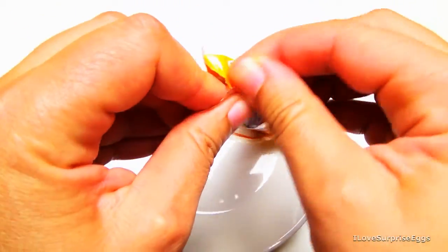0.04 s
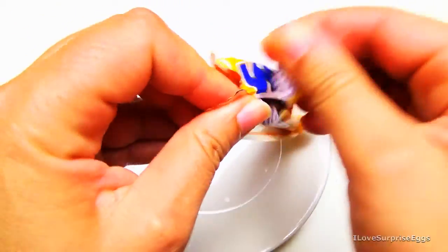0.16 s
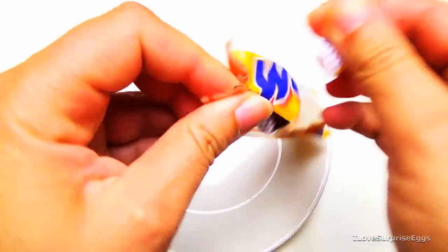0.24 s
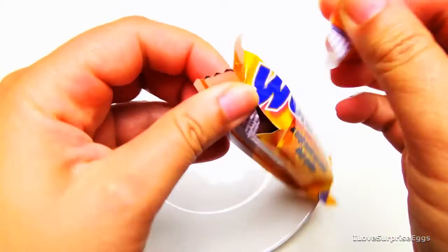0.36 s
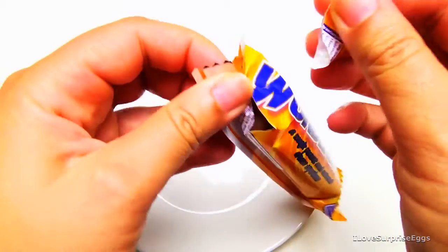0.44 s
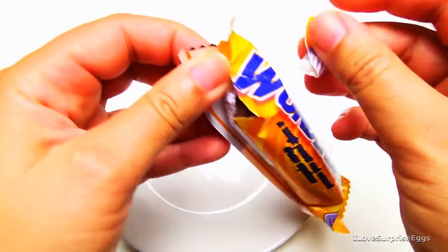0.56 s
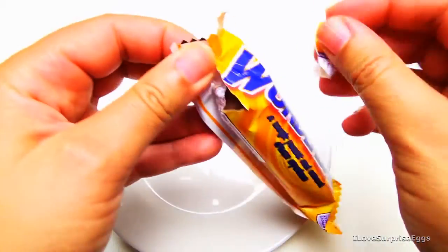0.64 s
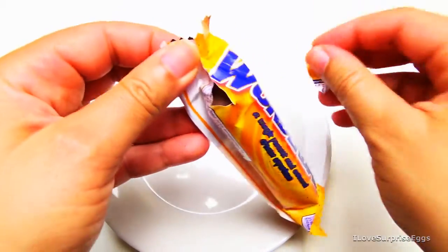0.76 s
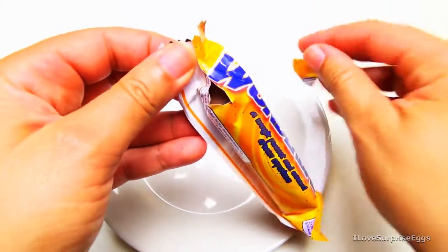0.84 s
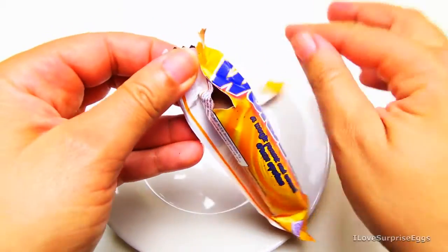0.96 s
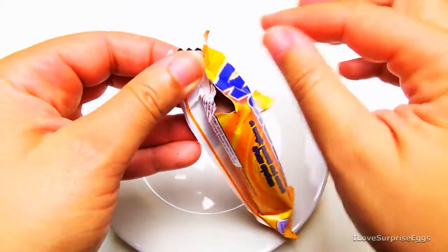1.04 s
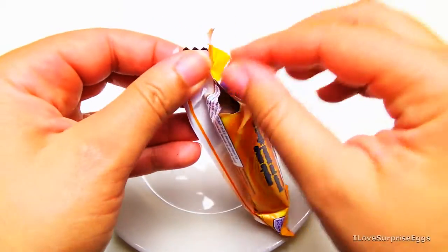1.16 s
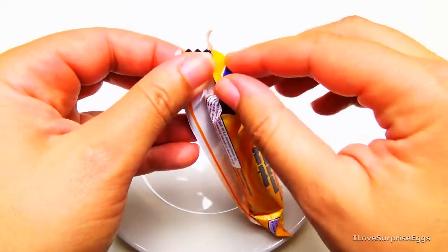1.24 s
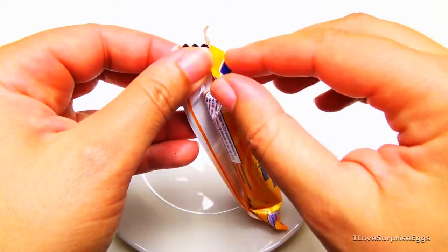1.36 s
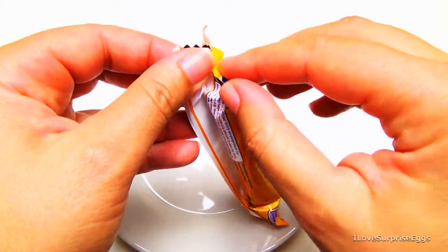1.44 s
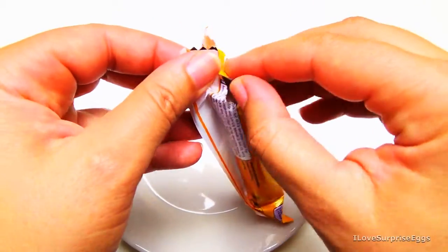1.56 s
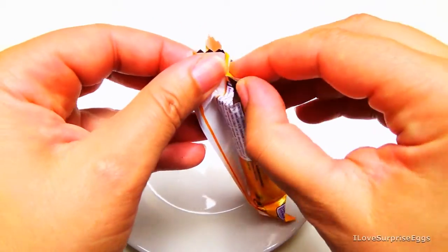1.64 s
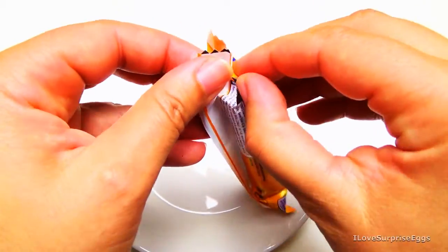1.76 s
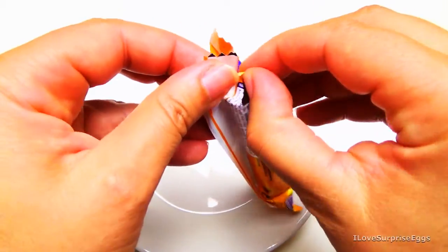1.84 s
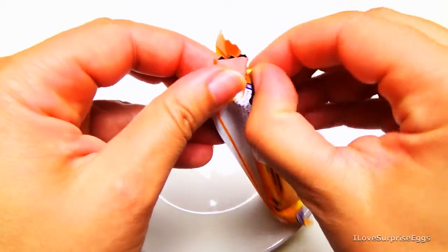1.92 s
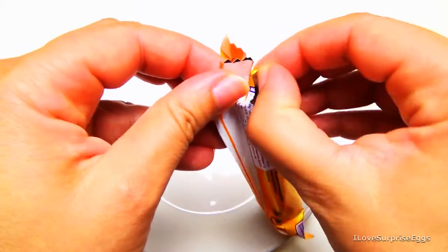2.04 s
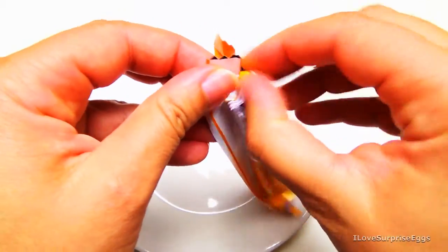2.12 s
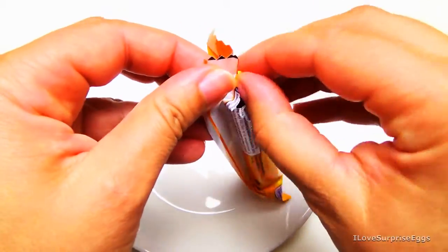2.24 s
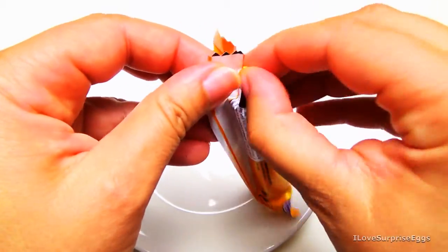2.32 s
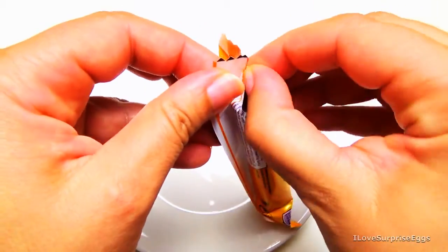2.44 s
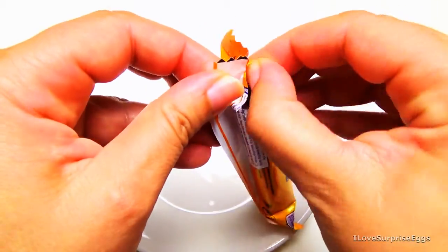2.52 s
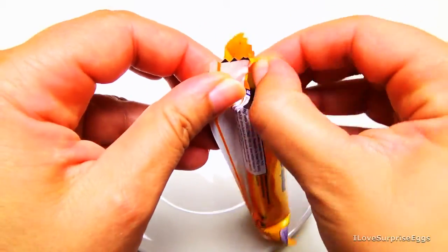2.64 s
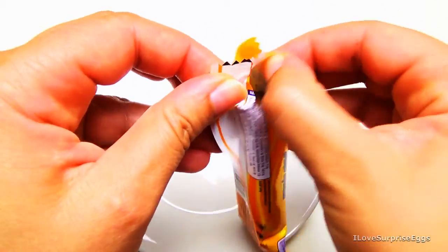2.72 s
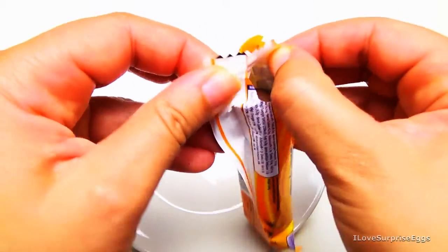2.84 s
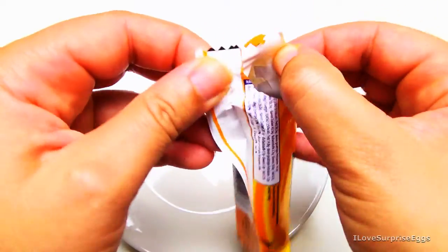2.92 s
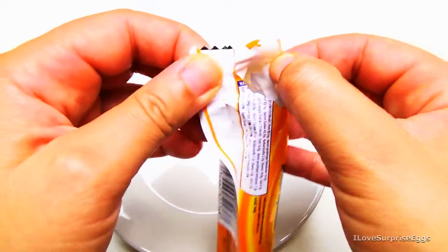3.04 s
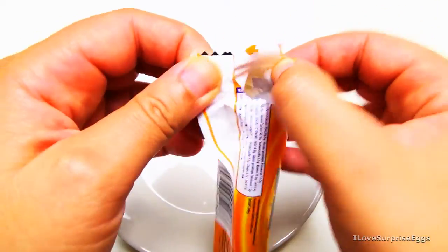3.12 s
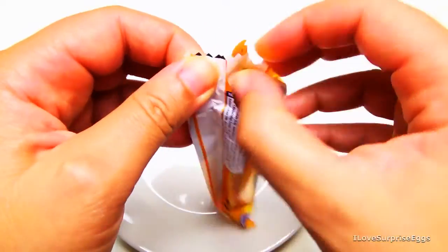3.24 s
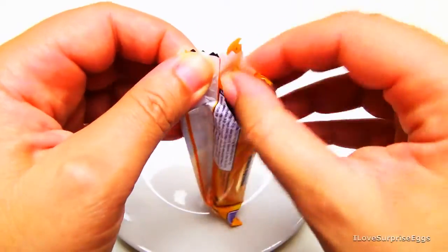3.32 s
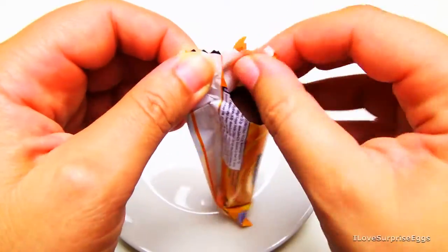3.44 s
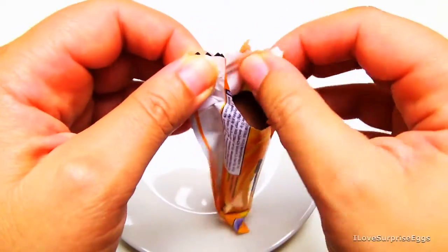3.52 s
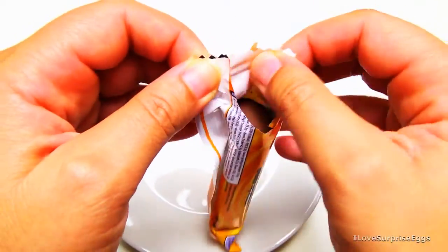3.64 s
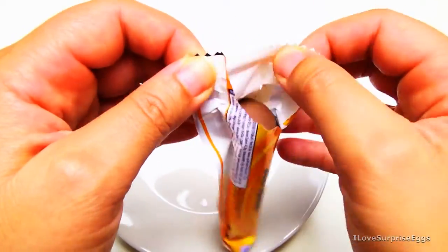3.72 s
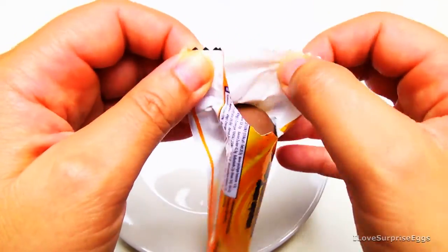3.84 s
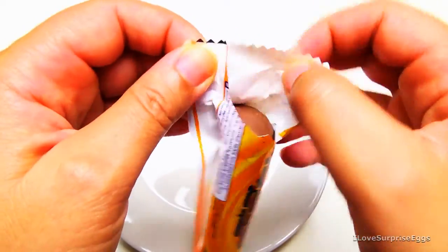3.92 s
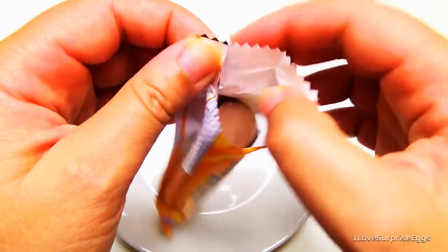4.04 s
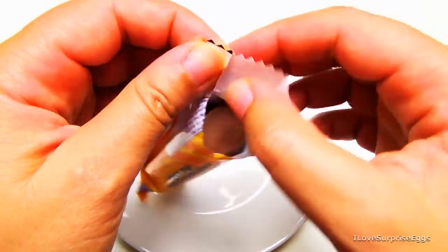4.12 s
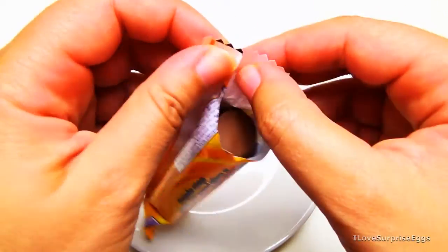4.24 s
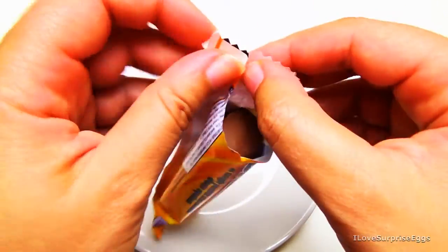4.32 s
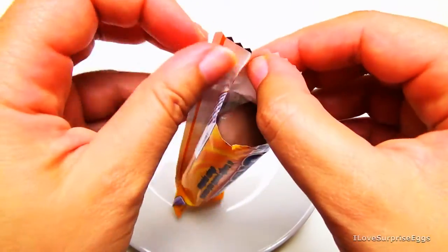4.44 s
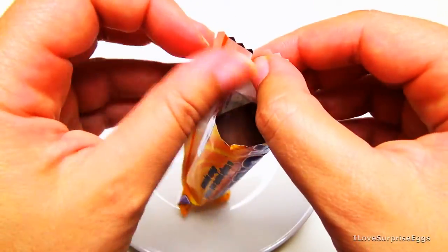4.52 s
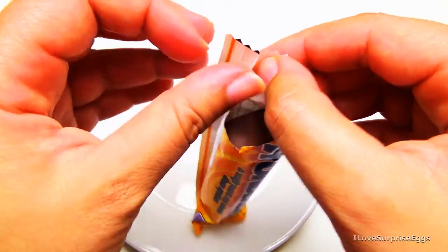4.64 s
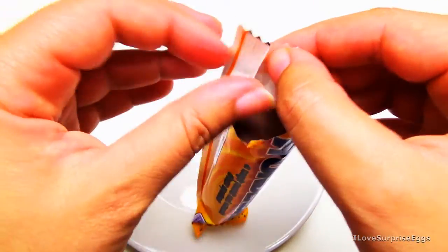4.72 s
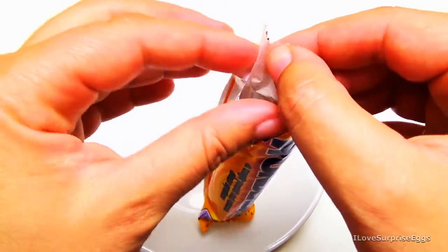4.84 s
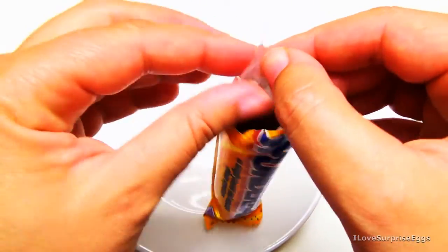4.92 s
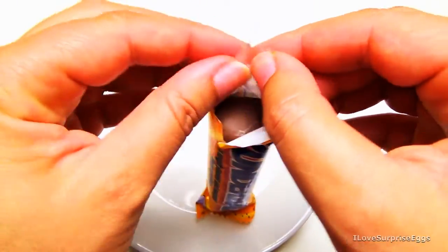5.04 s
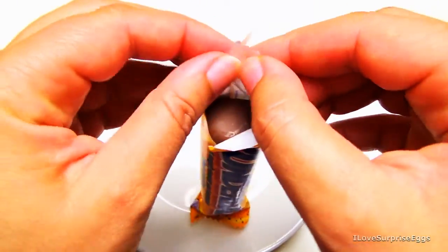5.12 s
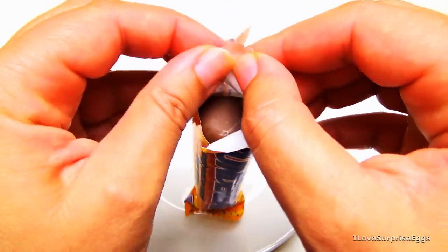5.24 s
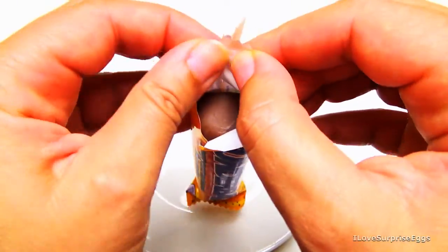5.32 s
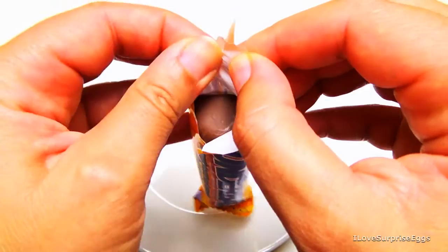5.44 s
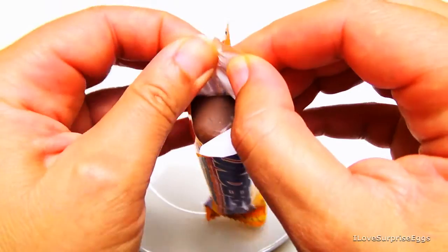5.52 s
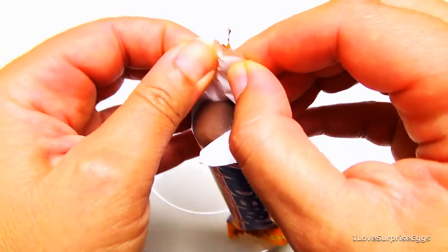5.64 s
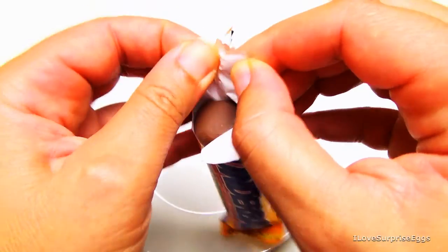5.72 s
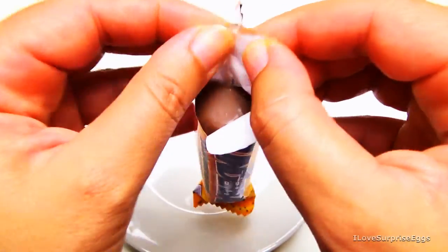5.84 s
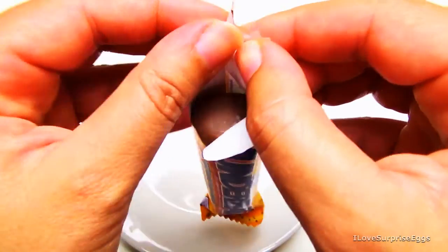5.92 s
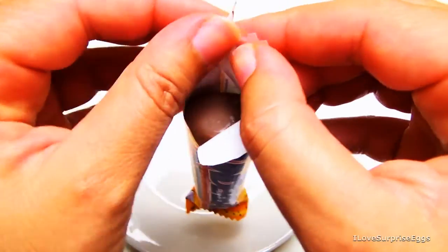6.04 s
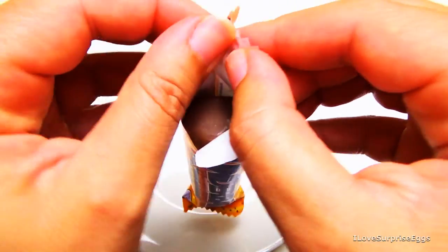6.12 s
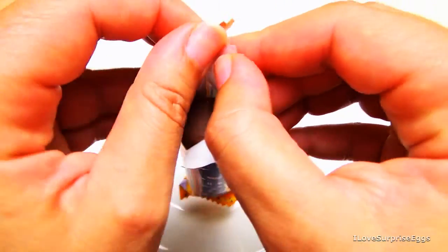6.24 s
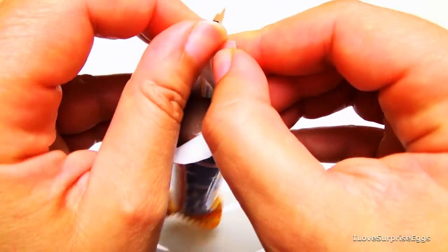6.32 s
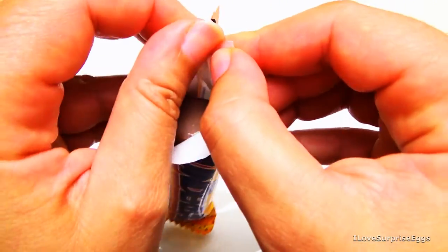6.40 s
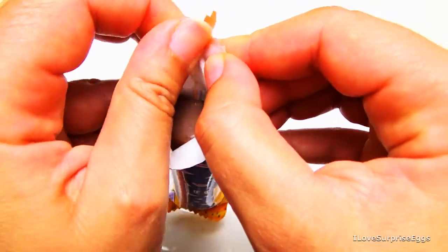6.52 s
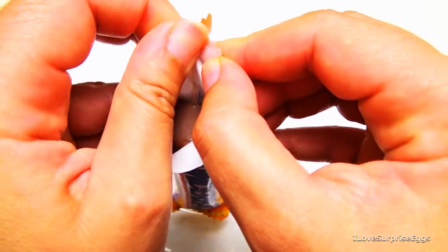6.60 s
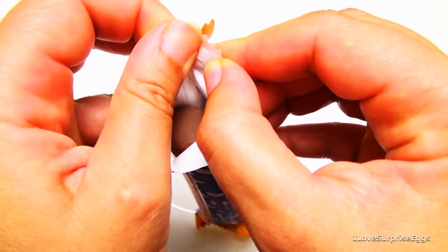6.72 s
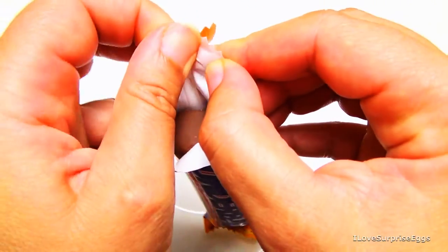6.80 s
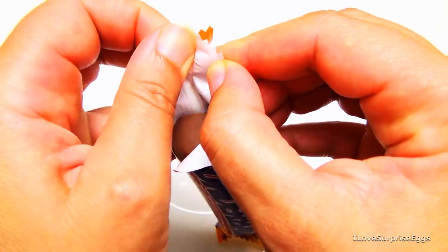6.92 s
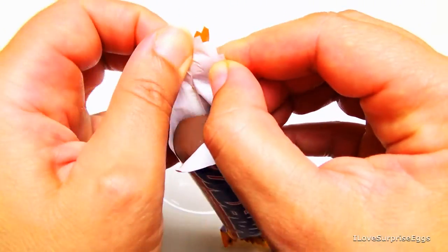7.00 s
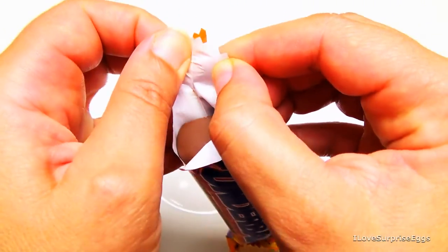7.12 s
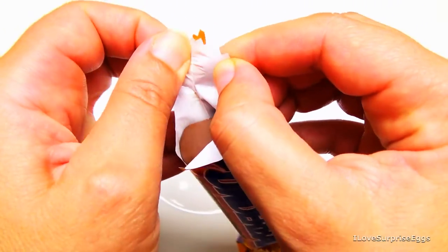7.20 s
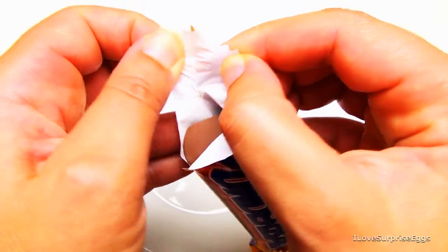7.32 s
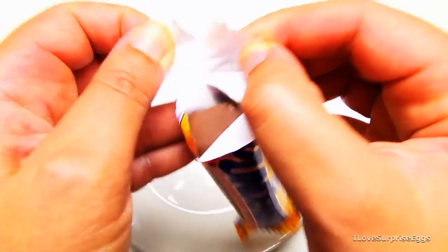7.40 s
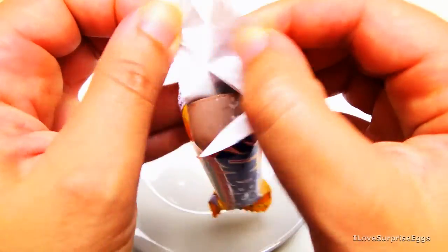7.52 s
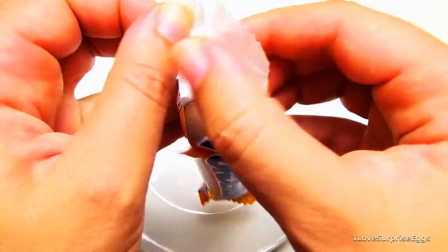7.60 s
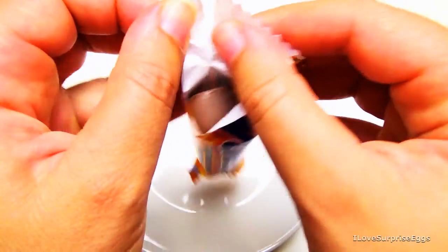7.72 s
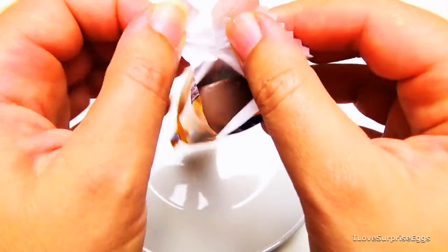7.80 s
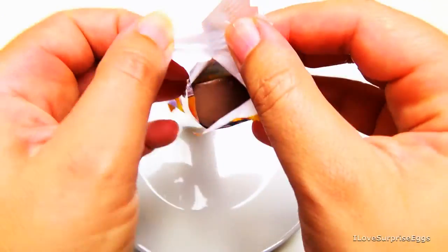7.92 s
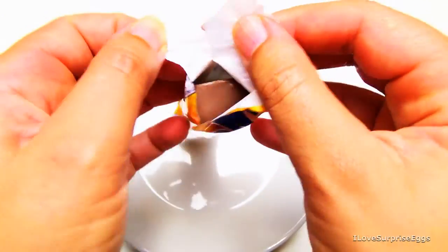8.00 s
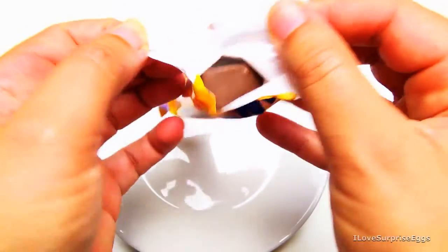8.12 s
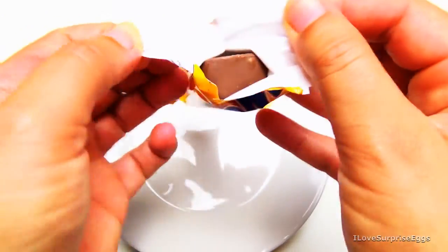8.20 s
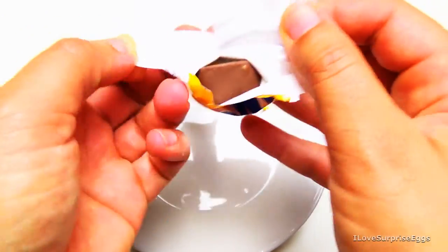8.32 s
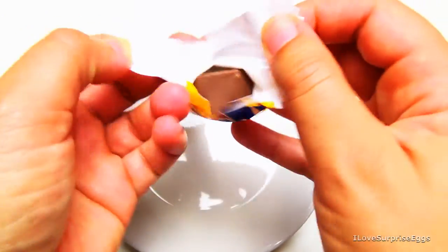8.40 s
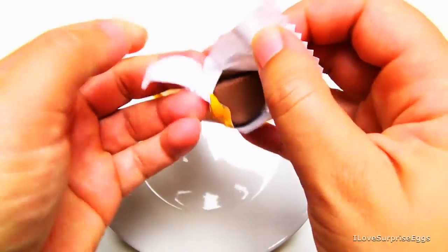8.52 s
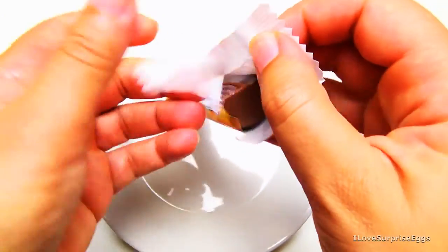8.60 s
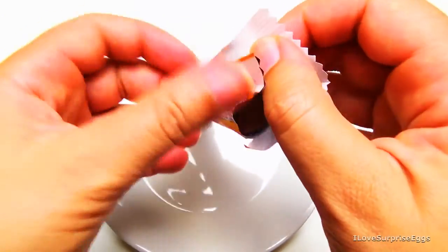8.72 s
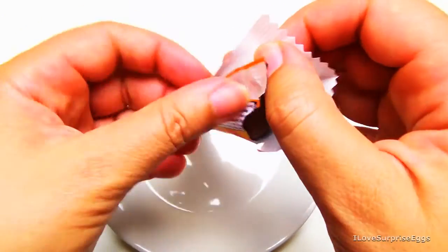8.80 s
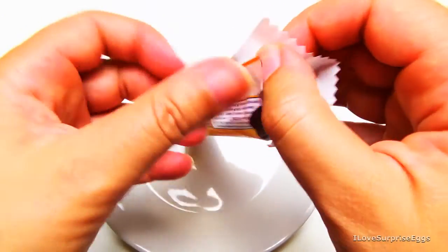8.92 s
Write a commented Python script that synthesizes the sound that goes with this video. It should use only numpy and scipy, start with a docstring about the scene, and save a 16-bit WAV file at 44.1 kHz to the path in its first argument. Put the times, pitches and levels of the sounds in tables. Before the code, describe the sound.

A thin plastic candy wrapper crackles, rustles and hisses in irregular bursts under fingers in a quiet room, with a few dull bumps.

```python
"""Small quiet room: two hands tear and peel the plastic wrapper off a chocolate bar, close to the microphone.
Buckling creases snap and ring the film facets beside them; random slips make the film rustle and hiss.
Taut stretches dragged over the bar ring at a sinking pitch. Dull thumps are damped modes, most of them the bar
bumping fingers and wrapper; once the wrapper's end flicks the plate below, which rings as decaying sines.
Behind lie shaped air noise, two steady hum tones and a thin whine."""
import sys
import numpy as np
from scipy import signal
from scipy.fft import rfft, irfft
from scipy.io import wavfile
from scipy.ndimage import uniform_filter1d

SR = 44100
rng = np.random.default_rng(int(sys.argv[2]) if len(sys.argv) > 2 else 0)


def dump(signal):
    """Clip the signal to [-1, 1] and save it as 16-bit WAV at the path in sys.argv[1]."""
    limited = np.clip(np.atleast_2d(signal).T, -1, 1)
    pcm = np.round(limited * 32767).astype(np.int16)
    wavfile.write(sys.argv[1], SR, pcm)


N = 395136

# time for a slide or drag to rise by, and to die away by, 20 dB
SLIDE_ATTACK_S, SLIDE_RELEASE_S = 0.053, 0.083


def from_db(db):
    """Decibels to gain."""
    return 10 ** (np.asarray(db) / 20)


def rms_one(x):
    """Scale to rms 1."""
    return x / np.sqrt(np.mean(x ** 2) + 1e-20)


def one_ms(x):
    """Scale a pulse to the energy of one millisecond at rms 1."""
    return x * np.sqrt(SR / 1000 / (np.sum(x ** 2) + 1e-20))


def in_time(rows):
    """Interpolate rows of (t/s, values) to one curve per value column, at the sample rate."""
    s, *columns = np.transpose(rows)
    t = np.arange(N) / SR
    return [np.interp(t, s, c) for c in columns]


def coloured(x, points):
    """Filter by a gain curve of (f/Hz, gain/dB), interpolated over log frequency."""
    hz, db = np.transpose(points)
    log_hz = np.log(np.fft.rfftfreq(N, 1 / SR) + 1)
    gain = from_db(np.interp(log_hz, np.log(hz), db))
    return irfft(rfft(x) * gain, N)


def butter(x, hz, kind, order=2):
    """Causal Butterworth filter."""
    sos = signal.butter(order, np.clip(hz, 10, .45 * SR), kind, fs=SR, output="sos")
    return signal.sosfilt(sos, x)


def resonance(x, hz, q):
    """One damped mode of about unit peak gain."""
    hz = min(hz, .42 * SR)
    r = np.exp(-np.pi * hz / q / SR)
    zeros = np.array([1, 0, -1]) * (1 - r * r) / 2
    poles = [1, -2 * r * np.cos(2 * np.pi * hz / SR), r * r]
    return signal.lfilter(zeros, poles, x + 1e-18)


def gliding(x, hz, q, size=128):
    """One damped mode whose pitch moves block by block; rms 1."""
    out, state = np.zeros(len(x)), np.zeros(2)
    for i in range(0, len(x), size):
        w = 2 * np.pi * hz[i] / SR
        r = np.exp(-w / q / 2)
        poles = [1, -2 * r * np.cos(w), r * r]
        out[i:i + size], state = signal.lfilter([1 - r, 0, r - 1], poles, x[i:i + size], zi=state)
    return rms_one(out)


def drift(rate_hz):
    """Slow random wander of rms 1."""
    return rms_one(butter(rng.standard_normal(N + SR), rate_hz, "low")[SR:])


def tone(hz, db):
    """Steady sine at an rms level."""
    return from_db(db) * np.sqrt(2) * np.sin(2 * np.pi * hz * np.arange(N) / SR)


def add(track, s, sound):
    """Mix a sound in at a time."""
    at = max(0, round(s * SR))
    track[at:at + len(sound)] += sound[:max(0, len(track) - at)]


def background(foreground, open_db=-42, air_cut_db=5, whine_cut_db=13, hold_s=0.34):
    """Air, hum and electronic whine; a noise suppressor turns air and whine down while the wrapper is quiet."""
    # room air and microphone noise: f/Hz, relative level/dB
    air_colour = [(30, -28.5), (110, -1), (350, 4.5), (500, -4), (950, 0), (1300, -8.5), (6000, -23),
                  (12000, -11)]
    # faint steady hum: f/Hz, level/dB
    hum = [(409, -85.5), (1017, -83.5)]
    open_air_db = -69
    whine_hz, open_whine_db = 15625, -70
    power = np.abs(uniform_filter1d(foreground ** 2, int(hold_s * SR)))
    closed = 1 / (1 + np.sqrt(power) / from_db(open_db))
    air_noise = rms_one(coloured(rng.standard_normal(N), air_colour))
    air = from_db(open_air_db - air_cut_db * closed) * air_noise
    whine = tone(whine_hz, open_whine_db - whine_cut_db * closed ** 2)
    return air + whine + sum(tone(hz, db) for hz, db in hum)


def room(x, early_db=-21, early_t60_s=0.027, tail_db=-25, tail_t60_s=0.47, wall_hz=4500, size=16384):
    """Quick scatter from hands, plate and table, then a faint dull tail."""
    t = np.arange(size) / SR
    early = rng.standard_normal(size) * from_db(-60 * t / early_t60_s)
    tail = butter(rng.standard_normal(size), wall_hz, "low", order=1) * from_db(-60 * t / tail_t60_s)
    echo = (from_db(early_db) * rms_one(early) + from_db(tail_db) * rms_one(tail)) / np.sqrt(size)
    return x + signal.fftconvolve(x, echo)[:N]


def ports(x, size=161, bass_hz=220):
    """Two close ports hear nearly equal levels; housing scatter shifts their phases, most of all in the bass."""
    # difference between the two microphone ports: f/Hz, side gain/dB
    width = [(60, 0), (250, -8), (600, -13), (5000, -17.5)]
    scatter = rng.standard_normal(size) * np.hanning(size)
    phase_only = rms_one(scatter - scatter[::-1]) / np.sqrt(size)   # odd kernel: quarter-cycle shift
    low = signal.sosfiltfilt(signal.butter(1, bass_hz, fs=SR, output="sos"), x)
    bass = signal.hilbert(low).imag
    side = coloured(signal.fftconvolve(x, phase_only, mode="same") + bass, width)
    return np.array([x + side, x - side])


def plate(size=16384):
    """A light flick excites the plate's modes, each a sine dying away at its own rate."""
    # loose wrapper end flicks the china plate: t/s, level/dB
    touches = [(0.991, -59)]
    # plate modes: f/Hz, relative level/dB, t60/s
    modes = [(2820, -7, 0.22), (4450, 1.5, 0.089), (5700, 3, 0.11), (7400, 12, 0.048)]
    out, t = np.zeros(N), np.arange(size) / SR
    ring = sum(from_db(db - 60 * t / t60) * np.sin(2 * np.pi * hz * t) for hz, db, t60 in modes)
    for s, db in touches:
        add(out, s, from_db(db) * ring)
    return out


def kick(noise, flutter, decay_s):
    """A single impulse, then decaying noise: for film, a sudden flip and waves scattering among creases."""
    t = np.arange(len(noise)) / SR
    return (t == 0) + flutter * noise * np.exp(-t / decay_s)


def thumps(q=2.2, size=4096):
    """Each kick drives one heavily damped mode, which gives a few dull cycles."""
    # dull thumps: t/s, f/Hz, level/dB (energy in one ms); the two near 110 Hz
    # are low thumps as a loud snap overloads the microphone
    rows = [(1.388, 354, -52), (1.826, 950, -28), (2.768, 110.2, -44), (3.015, 108.3, -43.5),
            (3.21, 502, -33), (3.273, 341, -28.5), (7.601, 292.5, -26), (7.874, 204, -35),
            (8.686, 257, -34.5)]
    out = np.zeros(N)
    for (s, hz, db), noise in zip(rows, rng.standard_normal((len(rows), size))):
        push = kick(noise, flutter=0.021, decay_s=0.028)
        thump = butter(resonance(push, hz, q), 2 * hz, "low")
        add(out, s, from_db(db) * one_ms(thump))
    return out


def handling(rustle_db, tilt_db, rub_db=-22, top_hz=500):
    """Fingertips on the wrapper add a dull rub under the rustle, stronger the slacker the sheet."""
    rub = butter(rng.standard_normal(N), [130, top_hz], "band", order=1)
    return from_db(rub_db + rustle_db - tilt_db) * rms_one(rub)


def stroke(t, start, hold, attack_s, release_s):
    """Power of one movement of the hands: it swells, holds and dies away."""
    swell = np.maximum(start - t, 0) / attack_s
    fade = np.maximum(t - start - hold, 0) / release_s
    return from_db(-20 * (swell + fade)) ** 2


def movements():
    """Powers of pulls and slides add up to the sheet's rustle/dB, tautness/(dB/octave) and hiss/dB."""
    # hands bend or pull the sheet: start/s, hold/s, rustle level/dB, tautness as rustle tilt/(dB/octave)
    pulls = [(0.158, 0.14, -43, 5), (0.546, 0.075, -64, 2), (1.537, 0.032, -52, 1.5),
             (1.818, 0.0072, -47, 5), (1.991, 0.027, -53, 5), (2.194, 0.0084, -39.5, 8.5),
             (2.433, 0.2, -60, 6), (2.787, 0.012, -34.5, 2), (3.157, 0.0086, -36.5, 2.5),
             (3.268, 0.06, -37, 1.5), (3.349, 0.41, -49.5, 4.5), (3.757, 0.013, -28.5, 1.5),
             (3.988, 0.021, -43, -4), (4.105, 0.17, -46.5, -3.5), (4.41, 0.052, -45.5, -5),
             (4.579, 0.36, -64, 2.5), (5.005, 0.015, -35.5, 1), (5.916, 0.04, -45, 0.5),
             (6.561, 0.036, -57, 10.5), (7.437, 0.019, -29.5, 6.5), (7.618, 0.019, -37, -4.5),
             (7.879, 0.01, -38, -0.5), (8.494, 0.081, -35, 1.5), (8.624, 0.065, -43, 3.5)]
    # film slides over film or chocolate: start/s, hold/s, hiss level/dB, sheet shake re hiss/dB
    slides = [(0.121, 0.026, -44, -27), (0.484, 0.29, -59, -32), (0.911, 0.19, -57, -12.5),
              (1.241, 0.12, -64, 0.5), (1.956, 0.085, -50.5, -28), (2.255, 0.0079, -46, -11),
              (2.532, 0.43, -50, -31), (2.931, 0.16, -46.5, -4), (3.596, 0.13, -43.5, -34),
              (5.151, 0.64, -56.5, -9), (6.581, 0.81, -57.5, -26), (6.922, 0.45, -52, -30.5),
              (7.355, 0.068, -34, -19), (7.936, 0.068, -40.5, -19.5), (8.07, 0.14, -33, -6),
              (8.248, 0.17, -49.5, -9.5), (8.711, 0.15, -54.5, -5.5)]
    pull_attack_s, pull_release_s = 0.054, 0.064   # per 20 dB
    # a pull also hisses: dB re its rustle, and dB per dB/octave of tautness
    pull_hiss_db, hiss_per_tautness = -3.5, 0.41
    slide_tilt_db_per_octave = 2.5   # slides shake mostly the sheet's high resonances
    held_rustle_db, held_hiss_db = -96.5, -92.5   # merely held, the wrapper still stirs faintly
    t = np.arange(0, N / SR, .001)
    rustling, taut, hissing = from_db(held_rustle_db) ** 2, 0, from_db(held_hiss_db) ** 2
    for start, hold, db, tautness in pulls:
        power = from_db(db) ** 2 * stroke(t, start, hold, pull_attack_s, pull_release_s)
        rustling = rustling + power
        taut = taut + tautness * power
        hissing = hissing + power * from_db(pull_hiss_db + hiss_per_tautness * tautness) ** 2
    for start, hold, db, shake_db in slides:
        power = from_db(db) ** 2 * stroke(t, start, hold, SLIDE_ATTACK_S, SLIDE_RELEASE_S)
        shaken = power * from_db(shake_db) ** 2
        rustling = rustling + shaken
        taut = taut + slide_tilt_db_per_octave * shaken
        hissing = hissing + power
    curves = [t, 10 * np.log10(rustling), taut / rustling, 10 * np.log10(hissing)]
    return in_time(np.transpose(curves))


def slips(per_s, spread_db):
    """Stick and slip: clicks of random sign and time, their levels spread exponentially in dB."""
    sizes = from_db(spread_db * np.minimum(rng.exponential(1, N), 4))
    return (rng.random(N) < per_s / SR) * sizes * rng.choice([-1, 1], N)


def drags():
    """Dense slips drive the few modes of a taut stretch, leaving hollows between them."""
    # taut film dragged over the bar: start/s, hold/s, level/dB, f/Hz, brightness/(dB/octave)
    stretches = [(2.938, 0.049, -46, 1420, 1.5), (3.648, 0.1, -51.5, 1400, 12),
                 (5.289, 0.38, -57.5, 943, 9.5), (7.96, 0.08, -48, 1300, 13),
                 (8.067, 0.12, -41.5, 1077, 3.5)]
    # modes of such a stretch: multiple of its pitch, relative level/dB
    modes = [(1, 6), (2.699, 2.5), (3.9, -4)]
    sag_octaves_per_s = 0.35   # pitch sinks as the grip gives
    lead_s, q = .2, 4.5
    out, t = np.zeros(N), np.arange(SR) / SR
    friction = slips(per_s=3000, spread_db=0.5)
    for start, hold, db, pitch, bright_db in stretches:
        grip = drift(8.3)[:SR]   # an unsteady grip bends pitch and level together
        hz = pitch * 2 ** (-sag_octaves_per_s * (t - lead_s) + .065 * grip)
        ring = 0
        for multiple, mode_db in modes:
            push = np.roll(friction, rng.integers(N))[:SR] * from_db(2 * grip)
            mode = gliding(gliding(push, multiple * hz, q), multiple * hz, q)
            ring = ring + from_db(mode_db + bright_db * np.log2(multiple)) * mode
        swell = np.sqrt(stroke(t, lead_s, hold, SLIDE_ATTACK_S, SLIDE_RELEASE_S))
        add(out, start - lead_s, from_db(db) * rms_one(ring) * swell)
    return out


def rustle(tilt_db, flex_db=2.5):
    """Slips shake the sheet; pulled taut it favours its high resonances, slack its low ones."""
    # broad resonances of the loose sheet: f/Hz, width/Hz, relative level/dB
    sheet = [(867, 630, 9.5), (1550, 450, -1), (3250, 770, 6.5), (4500, 1200, 4)]
    out, power = 0, 0
    for hz, width_hz, db in sheet:
        shake = slips(per_s=1100, spread_db=5.5)
        mode = resonance(resonance(shake, hz, hz / width_hz / 2), hz, hz / width_hz)
        # the flexing sheet shifts the balance
        gain = from_db(db + tilt_db * np.log2(hz / 1000) + flex_db * drift(5))
        out = out + gain * rms_one(mode)
        power = power + gain ** 2
    return out / np.sqrt(power)


def grains(per_s, spread_db, low_hz, high_hz, count=12):
    """Tiny creases give way, each ringing one of several small facets for a few cycles."""
    clicks, dealt = slips(per_s, spread_db), rng.integers(0, count, N)
    rings = 0
    for k, hz in enumerate(np.geomspace(low_hz, high_hz, count)):
        rings = rings + resonance(clicks * (dealt == k), hz, q=3) / np.sqrt(hz)
    return rms_one(butter(rings, [low_hz, high_hz], "band"))


def sliding_film(rustle_db, tilt_db, hiss_db, crinkle_db=-6.0, tick_db=-10, catch_db=-4,
                 judder_db=4.0, light_db=-55, sticking_db=10.5):
    """Sheet rustles, surface hisses; a light touch moves in fits and catches, a firm pull slides evenly."""
    # colour of the fine friction: f/Hz, relative level/dB
    hiss_colour = [(3000, -27), (5200, -13.5), (7200, -7.5), (10500, -4.5), (13000, -9), (16000, -19)]
    judder = rms_one(from_db(judder_db * drift(28)))
    catching = 1 / (1 + from_db(2 * (hiss_db - light_db)))   # 1 = light touch, 0 = firm
    fits = from_db(sticking_db * catching * (drift(7.9) - 1.0))
    friction = coloured(slips(per_s=9300, spread_db=-0.5), hiss_colour)
    # the contact patch keeps changing size, and with it the colour of the hiss
    patch = gliding(friction, 9800 * 2 ** (.2 * drift(5)), q=4)
    hiss = fits * judder * rms_one(rms_one(friction) + .5 * patch)
    crinkle = from_db(crinkle_db) * grains(per_s=400, spread_db=5.5, low_hz=1300, high_hz=7450)
    ticks = from_db(tick_db) * grains(per_s=270, spread_db=1.5, low_hz=7100, high_hz=12500)
    catch_clicks = butter(slips(per_s=49, spread_db=8.5), [6500, 12000], "band")
    catches = from_db(catch_db) * catching * rms_one(catch_clicks)
    sheet = from_db(rustle_db) * (judder * rustle(tilt_db) + crinkle)
    surface = from_db(hiss_db) * (hiss + ticks + catches)
    return sheet + surface


def snaps(q_at_1khz=1.73, crack_q=0.11, lower_db=-8, crack_hz_at_1khz=5600, rebound=0.56, size=1024):
    """Each flip rings a film facet; the smaller the facet, the clearer its ring and the brighter its crack."""
    # creases buckling: t/s, facet f/Hz, facet level/dB, crack level/dB (levels: energy in one ms)
    creases = [(0.152, 3530, -20.5, -11.5), (0.2314, 4640, -21, -20), (0.2514, 4650, -29, -32),
               (0.2888, 1540, -26, -22.5), (0.303, 3500, -22.5, -20), (0.3511, 3940, -40, -25.5),
               (0.6606, 5200, -55.5, -29), (0.678, 840, -46, -46), (0.735, 4370, -65, -39.5),
               (0.9673, 3550, -62, -36), (1.54, 3870, -28, -24.5), (1.5527, 1460, -23, -20),
               (1.5736, 2880, -25, -17.5), (1.648, 3450, -24, -19), (1.8233, 3020, -14.5, -21.5),
               (1.843, 3500, -21, -18), (1.852, 4370, -22, -18), (2.1621, 1400, -33, -47),
               (2.1883, 3680, -32, -18), (2.1927, 4700, -31.5, -19.5), (2.2272, 4440, -27, -25),
               (2.279, 4500, -33, -39), (2.449, 1630, -34.5, -36), (2.48, 3520, -34, -52),
               (2.6397, 1780, -30.5, -48), (2.7678, 4000, -15.5, -11.5), (2.7972, 3360, -20, -24),
               (2.9121, 3780, -28.5, -27.5), (2.934, 3330, -23, -20), (3.0155, 3850, -20.5, -14),
               (3.0538, 5260, -18, -14), (3.0875, 1380, -23, -52), (3.1123, 1480, -26.5, -44),
               (3.162, 2320, -20, -24), (3.1947, 3420, -13, -17.5), (3.21, 1160, -18.5, -19),
               (3.256, 2920, -27, -21), (3.2751, 824, -22.5, -19), (3.2976, 3750, -46, -13),
               (3.385, 1060, -23.5, -31), (3.4627, 3900, -20, -42), (3.4888, 3930, -24, -29),
               (3.501, 4030, -23.5, -34), (3.516, 1150, -29.5, -25), (3.5586, 1240, -30.5, -55),
               (3.6384, 3900, -25, -15), (3.743, 1530, -20.5, -19), (3.756, 3870, -14.5, -15.5),
               (3.7789, 1390, -16, -14), (3.7949, 2480, -15, -34), (3.8, 3200, -19.5, -23),
               (3.9352, 2200, -35, -44), (3.9842, 940, -15, -19), (4.003, 1410, -30.5, -51),
               (4.03, 1100, -23, -32), (4.0612, 4000, -21.5, -26.5), (4.1148, 865, -18, -9.5),
               (4.1549, 680, -19, -16.5), (4.2285, 4500, -12.5, -13.5), (4.2702, 2820, -15, -20.5),
               (4.294, 2930, -16, -15.5), (4.4057, 3330, -19.5, -16), (4.426, 1040, -22.5, -17),
               (4.4632, 1400, -32, -42), (4.507, 1290, -32, -60), (4.5234, 1230, -36.5, -50),
               (4.655, 3120, -19, -21), (4.9555, 3860, -26, -40), (5.008, 3450, -15, -18),
               (5.0158, 4100, -13.5, -15), (5.031, 3620, -24.5, -19.5), (5.0955, 1750, -12, -37),
               (5.1714, 3250, -18.5, -17), (5.2133, 2400, -11.5, -22), (5.2563, 4630, -40, -20.5),
               (5.276, 1930, -32, -37), (5.3232, 1860, -34.5, -49), (5.4156, 3560, -49, -34),
               (5.4867, 1490, -34.5, -60), (5.5678, 1460, -24.5, -38), (5.619, 2940, -15.5, -18.5),
               (5.7653, 3530, -34.5, -42), (5.831, 3240, -39.5, -43), (5.8749, 3120, -28.5, -17),
               (5.9239, 1550, -21.5, -11.5), (5.948, 4600, -37, -24.5), (5.9783, 3050, -28, -36),
               (6.2144, 3225, -36, -59.5), (6.539, 4250, -13, -20), (6.611, 2970, -36.5, -49),
               (6.6476, 2390, -37, -53), (6.737, 1650, -20, -23), (6.767, 2040, -36.5, -32.5),
               (7.007, 3840, -57, -25.5), (7.0634, 4500, -63, -34), (7.2114, 1540, -42.5, -54),
               (7.3442, 1540, -22, -17), (7.441, 5100, -18, -14), (7.4765, 3240, -12.5, -13),
               (7.504, 2130, -25.5, -22.5), (7.5361, 3830, -34, -30.5), (7.5699, 3300, -26.5, -29),
               (7.577, 3100, -25, -24.5), (7.6013, 720, -15, -15.5), (7.612, 1410, -26, -21),
               (7.622, 4500, -10.5, -11.5), (7.661, 1930, -18.5, -19.5), (7.682, 3400, -32, -52),
               (7.725, 3550, -23, -25.5), (7.74, 3160, -16, -22), (7.7549, 3500, -13.5, -8.5),
               (7.785, 5100, -21, -39), (7.7924, 2970, -18.5, -25), (7.8724, 1430, -22, -21.5),
               (7.8864, 1020, -30.5, -43), (7.927, 905, -22, -26.5), (8.1834, 3030, -20, -14),
               (8.4408, 2930, -36, -38), (8.4999, 3980, -19, -16), (8.5109, 3170, -15.5, -10),
               (8.547, 3330, -16.5, -35), (8.556, 1960, -21.5, -14), (8.6155, 3680, -44, -14.5),
               (8.6385, 3780, -15.5, -12), (8.68, 3370, -20.5, -23.5), (8.7232, 3550, -27.5, -32),
               (8.8302, 3370, -31.5, -28.5), (8.95, 593, -34.5, -24)]
    out = np.zeros(N)
    for (s, hz, ring_db, edge_db), noise in zip(creases, rng.standard_normal((len(creases), 2, size))):
        push = kick(noise[0], flutter=.065, decay_s=.003)
        root_khz = (hz / 1000) ** .5
        q = q_at_1khz * root_khz   # large, slack facets ring for the fewest cycles
        facet = resonance(push, hz, q) + from_db(lower_db) * resonance(push, .5 * hz, q)
        facet = butter(facet, [min(0.59 * hz, 1000), 2.35 * hz], "band")
        flip = kick(noise[1], flutter=0.095, decay_s=0.0012)
        # the wave returns inverted from the nearest fold, typically 0.35 ms later
        add(flip, .00035 * np.exp(.5 * noise[0, 1]), -rebound * flip)
        crack = resonance(flip, crack_hz_at_1khz * root_khz, crack_q)
        crack = butter(butter(crack, 1.13 * hz, "high"), 11880, "low", order=4)
        snap = from_db(ring_db) * one_ms(facet) + from_db(edge_db) * one_ms(crack)
        add(out, s, np.sign(noise[0, 0]) * snap)
    return out


def scene():
    """Wrapper and bar in the middle, just in front of the microphone."""
    rustle_db, tilt_db, hiss_db = movements()
    film = snaps() + sliding_film(rustle_db, tilt_db, hiss_db) + drags()
    wrapper = room(film + thumps() + plate() + handling(rustle_db, tilt_db))
    return ports(wrapper + background(wrapper))


def record(dry):
    """Soft limiting rounds the sharpest peaks; a steep low-pass cuts the top."""
    ceiling, cutoff_hz = .8, 16300
    rounded = dry / (1 + (dry / ceiling) ** 4) ** .25
    return signal.sosfilt(signal.ellip(10, .1, 70, cutoff_hz, fs=SR, output="sos"), rounded)


dry = scene()
out = record(dry)
dump(out)
```